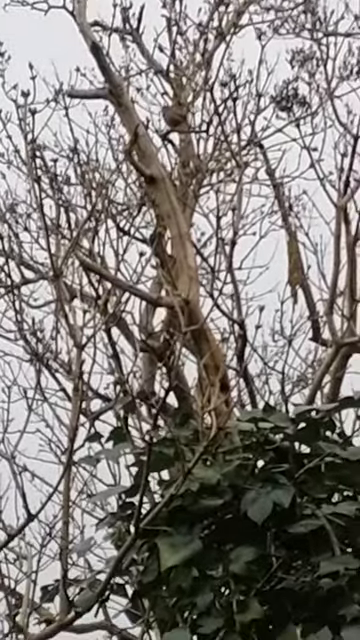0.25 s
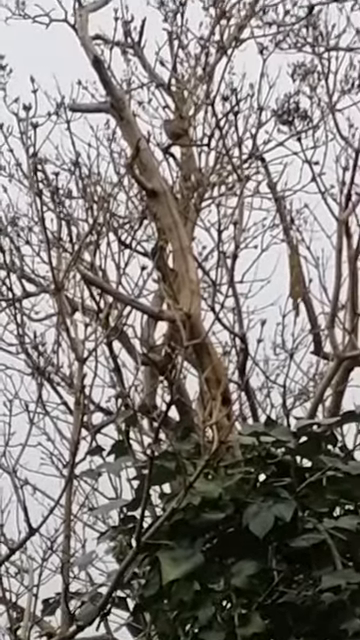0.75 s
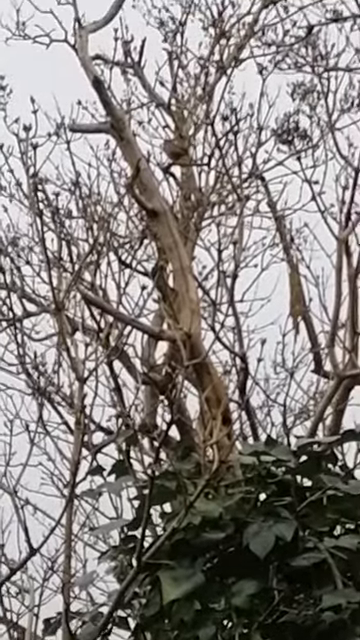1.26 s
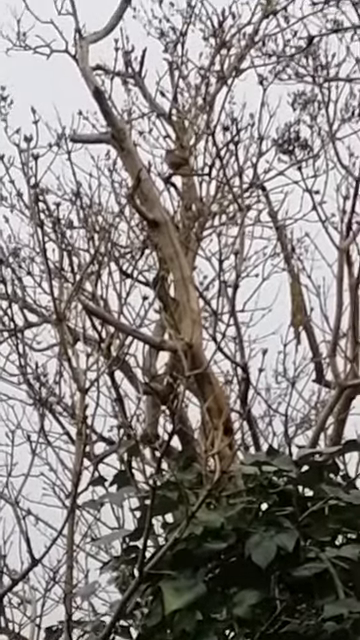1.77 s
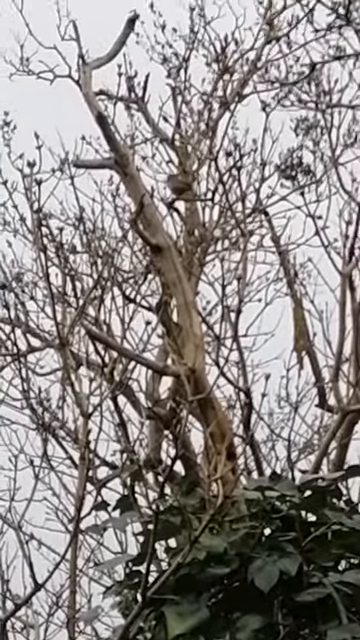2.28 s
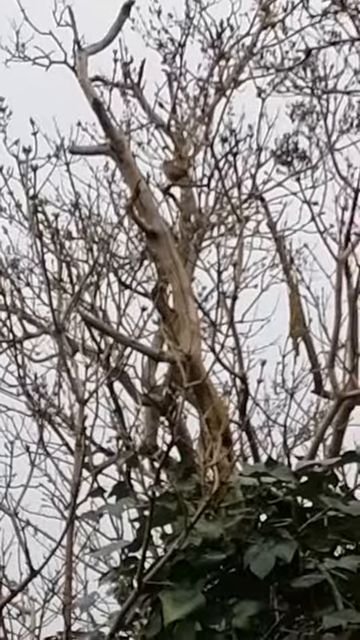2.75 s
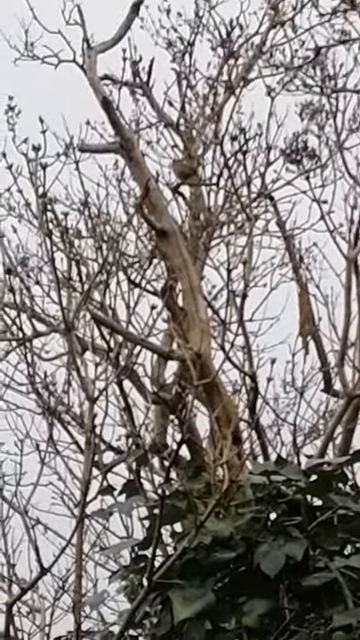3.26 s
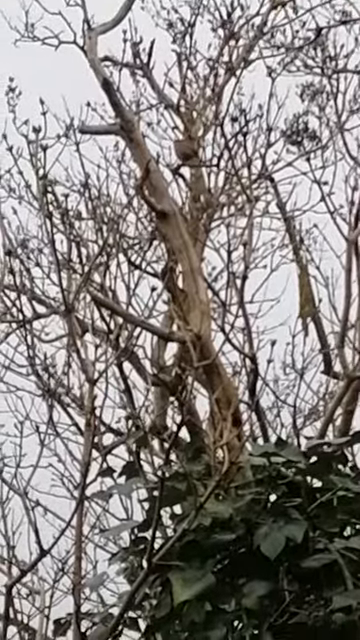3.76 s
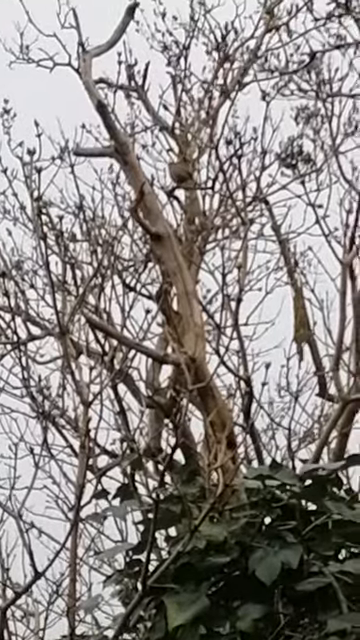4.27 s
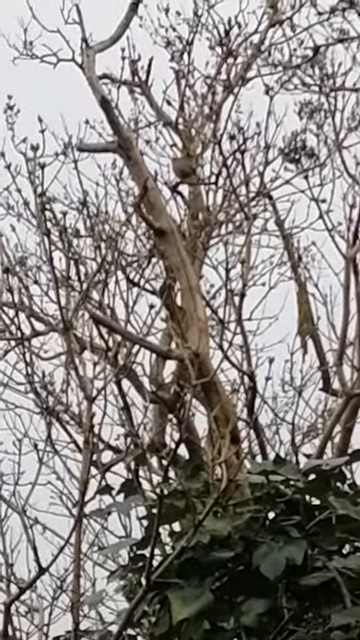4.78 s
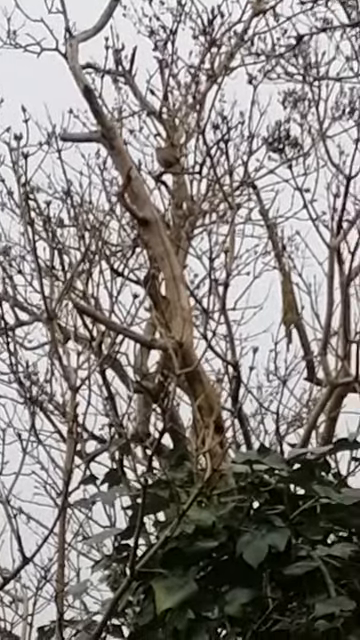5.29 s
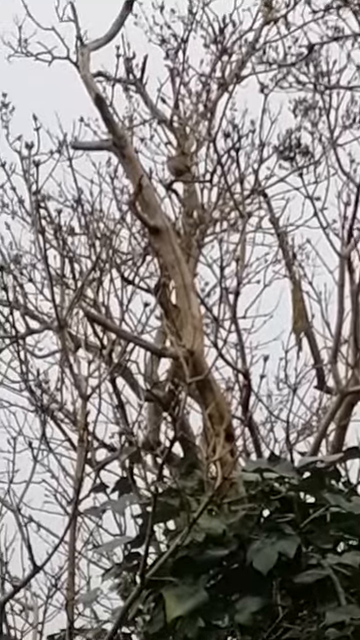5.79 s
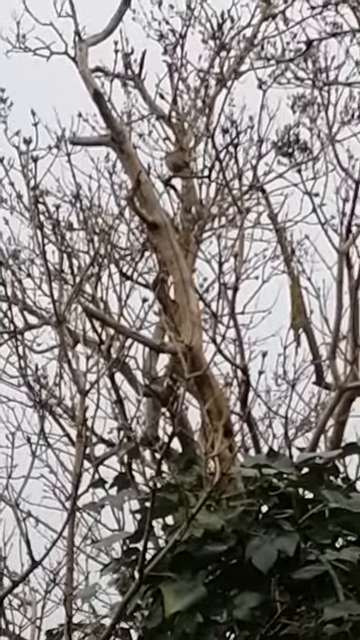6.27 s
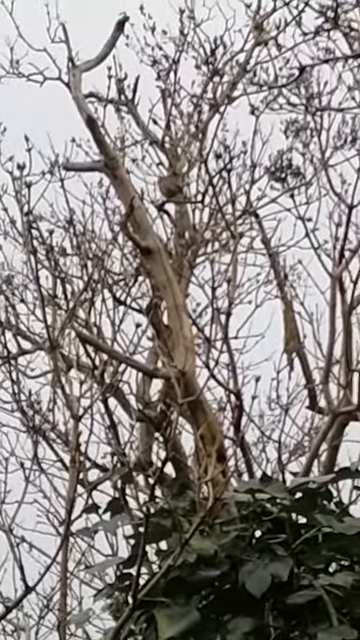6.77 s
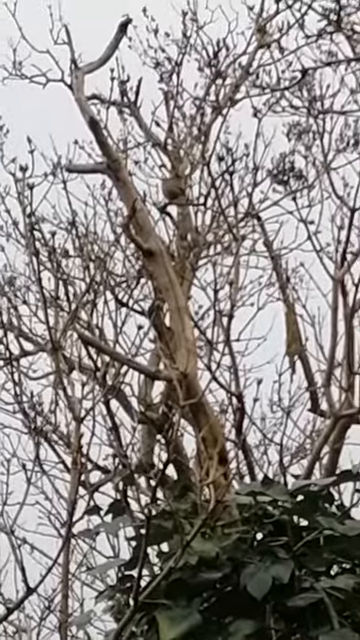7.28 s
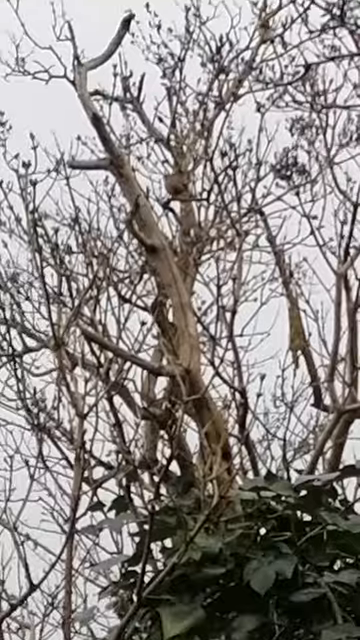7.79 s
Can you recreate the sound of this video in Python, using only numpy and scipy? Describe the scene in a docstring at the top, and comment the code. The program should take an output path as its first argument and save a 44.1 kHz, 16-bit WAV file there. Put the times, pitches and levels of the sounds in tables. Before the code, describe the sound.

A small wren is singing loudly nearby as the sound opens, with quick paired high chirps, then at 0.4-1.0 s an arching whistle, a lower whistle and a long steady one. From 1.1 to 1.8 s come four sharp upsweeps, each answered by a falling slur. A quieter dry, ticking rattle runs at about 1.9-2.2 s, then thin high whistles until 2.9. A fast trill of eight steep falling notes fills 2.9-3.65 s, followed by a long falling whistle, whip-like rising notes and fading slurs to about 4.6. The bird pauses; distant traffic swells gently around 4-6 s, with soft wind thumps, steady faint hiss, a barely audible low engine and faint scattered calls from farther birds. At 7 s a softer opening note starts a new verse: four paired chirps, then a whistle at 7.9, cut off at about 8 s. Short, diffuse woodland echoes surround the notes.

```python
"""A wren, already in song near the two microphone ports, whistles, slurs, rattles and trills in a bare tree; it
pauses, then starts a new verse. Each note is a gliding, nearly pure tone, scattered by trunks and twigs. Behind
it, filtered noise makes distant traffic that swells and fades, a slowly changing deep floor, gusts of wind on
the microphone and a steady hiss; a wavering low sine is a far engine. Fainter calls, mostly scattered sound,
come from further off."""
import sys
import numpy as np
from scipy import signal
from scipy.fft import rfft, irfft, next_fast_len
from scipy.io import wavfile
from scipy.ndimage import uniform_filter1d

SR = 44100
rng = np.random.default_rng(int(sys.argv[2]) if len(sys.argv) > 2 else 0)


def wav_record(signal):
    """Record a signal, one row per channel, as 16-bit PCM in the file named by sys.argv[1]."""
    frames = np.transpose(np.atleast_2d(signal))
    bounded = np.clip(frames, -1, 1)
    # unit amplitude maps onto the largest positive 16-bit level
    quanta = np.round(bounded * 32767).astype(np.int16)
    wavfile.write(sys.argv[1], SR, quanta)


N = 354563

# The birds' syllables at normal length and pitch:
# (attack [s], release [s], contour as a list of (time from note start [s], pitch [Hz]))
CREST = (0.026, 0.01784, [(0, 5280), (.013, 5740), (.036, 5880), (.056, 6210), (.086, 6080)])
DROP = (.004, .024, [(0, 5900), (.007, 5300), (.017, 4680), (.033, 3710)])
ARCH = (0.0091, 0.022, [(0, 6950), (.011, 7400), (.035, 7930), (.132, 8090), (.185, 7240), (0.209, 6740)])
LOW_WHISTLE = (.028, .006, [(0, 4860), (.02, 4958), (.055, 4697), (.103, 4673)])
WHISTLE = (0.014, 0.03, [(0, 6270), (.014, 6620), (0.036, 6810), (.07, 6890), (.165, 6803)])
RISE = (0.021, .014, [(0, 3440), (.016, 3470), (.032, 3920), (.058, 3727), (.075, 3440)])
UPSWEEP = (0.0059, .009, [(0, 5580), (.006, 6821), (.014, 7980), (.023, 8310), (.038, 7950), (.052, 7630)])
SLUR = (0.0099, 0.02, [(0, 5560), (.006, 6770), (.014, 6950), (.035, 6400), (.049, 5430), (.062, 4766),
        (0.075, 4165)])
TICK = (.001, 0.0018, [(0, 7580), (.003, 6700), (.005, 5544), (.009, 4870)])
TOCK = (0.0018, .002, [(0, 5950), (.003, 5440), (.007, 4950)])
FLICK = (.009, 0.025, [(0, 6150), (.009, 6730), (.018, 7510), (.031, 7430), (.076, 6545)])
HIGH_WHISTLE = (0.023, .025, [(0, 8424), (.01, 8180), (.02, 7586), (.033, 7400), (.058, 7950),
                (.178, 7960)])
SINK = (0.057, 0.0091, [(0, 6270), (.01, 6000), (.06, 5637), (.106, 5580)])
TRILL = (0.016, 0.02, [(0, 6894), (.016, 6527), (.024, 5520), (.033, 4650), (.047, 3690)])
LONG_FALL = (.01, 0.04, [(0, 7230), (.01, 7640), (0.026, 7506), (.083, 6940), (.198, 6854)])
WHIP = (0.017, .007, [(0, 4600), (.008, 4927), (.019, 5050), (.028, 5810), (.033, 6810)])
HIGH_SLUR = (.006, 0.022, [(0, 7990), (.035, 8300), (.061, 8250), (.088, 7550), (.11, 7300)])
LONG_SLUR = (0.011, 0.017, [(0, 8150), (.025, 7910), (.089, 7990), (.135, 7300), (.161, 7020)])
LOW_SLUR = (.022, .008, [(0, 4010), (.018, 4156), (.026, 4370), (.048, 3985), (.066, 3500), (.08, 3256)])
FALL = (0.013, 0.037, [(0, 3940), (.015, 3470), (.033, 3088), (.081, 2636)])
OPENING = (0.099, .025, [(0, 5500), (0.013, 6690), (.045, 6890), (.071, 6360), (.1, 5900), (.125, 5550),
           (.155, 5430)])

# The wren's runs of one syllable at a steady pace, levels before the paths and ports: (start [s], syllable,
# repeats, period [s], length factor, transposition [semitones], first level [dB], last level [dB])
RUNS = [ (-.125, CREST, 3, 0.16, 1.18, 0, -33, -31), (-.041, DROP, 3, 0.17, .96, -0.012, -30.5, -31.5),
        (1.082, UPSWEEP, 4, 0.18, 0.84, 0, -31, -29), (1.153, SLUR, 4, 0.19, 1.03, -.1, -29.5, -31),
        (1.936, TICK, 10, 0.027, 1.12, -.2, -42, -38.5), (1.95, TOCK, 10, .0294, 1, -.2, -47, -45),
        (2.9071, TRILL, 8, 0.095, 0.95, -0.12, -30.5, -30.5),
        (3.883, WHIP, 3, 0.1836, .92, -0.046, -29, -31), (3.921, HIGH_SLUR, 2, .185, 0.83, .1, -33.5, -35),
        (7.215, CREST, 4, 0.16, 1, 0.031, -36, -33), (7.299, DROP, 4, .1665, 1.07, 0, -37, -35.5), ]
# The wren's single notes, level before the paths and ports:
# (time [s], syllable, length factor, transposition [semitones], level [dB])
NOTES = [ (.389, ARCH, 1.034, -.12, -29.5), (.642, LOW_WHISTLE, 0.87, -0.11, -32),
         (.796, WHISTLE, 0.97, -0.049, -29), (.96, RISE, 0.9, -0.083, -39),
         (1.832, RISE, 0.91, 0.42, -38.5), (2.236, FLICK, 1.1, 0.19, -29),
         (2.36, LOW_WHISTLE, .96, -0.91, -35), (2.531, HIGH_WHISTLE, 1.12, 0.05, -29.5),
         (2.757, SINK, .9, 0.0068, -28), (3.679, LONG_FALL, .96, 0, -32),
         (4.302, LONG_SLUR, 0.96, 0.2, -36.5), (4.49, LOW_SLUR, .86, 0.025, -38.5),
         (6.972, OPENING, 1.005, -0.26, -42), (7.9, ARCH, 1.4, -0.59, -36), ]
# Calls of birds further off, level before the paths and ports:
# (time [s], syllable, length factor, transposition [semitones], level [dB])
FAR_CALLS = [ (.1, RISE, .6, -5, -55), (.65, RISE, .82, -1.5, -55), (.73, FALL, 0.8, 0, -49),
             (1.86, LOW_WHISTLE, 1.8, -10.5, -69.5), (2.862, WHIP, 1.45, -8, -56.5),
             (2.945, FALL, .8, 0.5, -49.5), (4.6, RISE, 1.23, 4, -56), (4.655, FALL, .88, 0, -49),
             (4.98, SINK, 0.55, 2.2, -68), (5.07, WHIP, 1.7, -1.5, -66), (5.345, TRILL, .95, -4.5, -58),
             (5.39, RISE, 0.31, -6, -52.5), (5.55, RISE, 0.91, .5, -65.5), (5.78, WHIP, 1.2, -2, -68),
             (6.68, SINK, 0.47, -.3, -72), (6.84, LOW_WHISTLE, 0.62, 0.5, -66),
             (6.85, LONG_FALL, .32, -0.3, -65), ]
# Echoes from trunks and limbs near the perch, level relative to the direct sound:
# (left delay [s], right delay [s], level [dB])
TRUNK_ECHOES = [(.0042, 0.0086, -16.5), (0.0142, 0.0095, -2.5), (0.0174, 0.016, -12.5), (0.024, 0.02, -20),
                (0.0338, 0.025, -15)]
# Response of the two ports to the birds: (frequency [Hz], left gain [dB], right gain [dB])
PORT_RESPONSE = [(2640, 0, 6), (4050, -3, -7), (5440, 2, 2), (5870, 1, -5.5), (7400, 2, -13.5),
                 (7950, -3, -14), (8800, -2.5, -11.5), (11700, -3.5, -7.5), (14500, -1.5, -4)]
# Background at the ports: (frequency [Hz], left-right correlation [-1 to 1], left minus right [dB])
BACKGROUND_SPREAD = [(30.02, 0.15, 2.5), (250, 0.95, 4), (622, .82, 4), (1100, 0.87, -3.5),
                     (1940, 0.28, -3), (15000, 0.25, 2.5)]

# Spectrum of tyre noise, shape only: (frequency [Hz], relative density [dB per Hz])
TYRE_SPECTRUM = [(200, -19.5), (400, -4), (600, -3.5), (900, 0.5), (1200, -5), (1650, -7.5), (2200, -15.5),
                 (3200, -18), (5000, -42.5), (9000, -50.5)]
# Spectrum of engine rumble, also used for wind buffeting: (frequency [Hz], relative density [dB per Hz])
RUMBLE_SPECTRUM = [(70, -12), (120, 1), (160, -3.5), (220, 2), (310, -2), (430, -15), (800, -26.5),
                   (3000, -66.5)]
# Spectrum of air on the microphone, shape only: (frequency [Hz], relative density [dB per Hz])
WIND_SPECTRUM = [(20, -2), (30, -0.5), (45, -1), (65, -2), (110, -1), (170, -20), (400, -38.5)]
# Spectrum of the steady hiss, shape only: (frequency [Hz], relative density [dB per Hz])
HISS_SPECTRUM = [(1500, 3.5), (3000, -1.5), (5200, 2.5), (7000, -1.5), (9000, -12.5), (12000, -9),
                 (15000, -2), (16000, -21)]

# Flow of the far road, before the offsets of its two parts: (time [s], level [dB])
ROAD_FLOW = [(0.1, -63.5), (0.16, -62), (0.25, -66), (1.68, -67.5), (2.1, -61.5), (2.64, -66.5),
             (3.88, -61), (4.1, -56.5), (4.31, -58.5), (4.64, -55), (4.9, -57), (6.25, -56.5),
             (7.79, -61.5), (7.9, -59)]
# A far engine's drone, before its random throb: (time [s], level [dB])
DRONE_LEVEL = [(0, -69.5), (1.899, -72.5), (2.2, -59.5), (2.7, -65.5), (2.95, -67), (6, -70), (6.5, -58.5),
               (7, -59.5), (7.4, -68), (7.7, -62), (8.04, -47.5)]
# A low, slowly changing floor of deep noise, before its overall offset: (time [s], level [dB])
LOW_FLOOR = [(0.0, -75), (3.09, -72.5), (4.97, -56.5), (7.03, -69.5), (8.04, -66.5)]
# Gusts on the microphone; length runs from the start until the dying away: (start [s], length [s], level [dB])
GUSTS = [(0.085, 0.1308, -62.5), (.72, 0.092, -62.5), (1.43, 0.15, -60), (1.959, 0.23, -57.5),
         (3.118, .13, -51.5), (4.193, .1, -53), (4.66, 0.28, -52), (5.21, .11, -49.5)]

LEAD = SR // 2  # samples of song before the scene opens
PORT_LAG_S = 0.00014  # the wren's direct sound reaches the right port later
ROAD_LAG_S = 0.00013  # the road reaches the left port first
REPEAT_SEMITONES, REPEAT_LENGTH, REPEAT_DB = 0.12, 0.012, 1  # spread from one repeat to the next
FADE_DB, SAG_DB_PER_S = 15.5, 13.5  # depth of a note's attack and release; steady sag along the note
SWEEP_SPREAD = 0.04  # random spread of glide depth, as a share
OCTAVE_DB = -36.5  # relative to the note's fundamental
PASS_S, PASS_WIDTH_S, PASS_DB = 4.74, 0.12, -49  # passing rumble: peak time, half width at -3 dB, peak level
GUST_ATTACK_S, GUST_RELEASE_S = 0.028, 0.079  # linear rise; time constant of the decay


def from_db(db):
    """Decibels to an amplitude factor."""
    return 10 ** (np.asarray(db) / 20)


def at_hz(points, hz, axis=1):
    """Read one column of a frequency table on a log-frequency axis."""
    points = np.array(points)
    return np.interp(np.log(hz + 1), np.log(points[:, 0]), points[:, axis])


def gain_curve(rows):
    """Turn (time [s], level [dB]) rows into a gain for every sample."""
    return from_db(np.interp(np.arange(N) / SR, *np.transpose(rows)))


def drift(rate_hz, size):
    """Random wander of spread about 1: straight lines between random knots, rate_hz knots a second."""
    knots = rng.standard_normal(4096)
    return np.interp(np.arange(size) * rate_hz / SR, np.arange(len(knots)), knots)


def syllable(shape, stretch, semitones, waver, flutter_db=1.12, edge_s=0.002):
    """One note of the syrinx: a gliding tone with attack, hold and release, a slight waver and a weak octave."""
    attack_s, release_s, contour = shape
    s, hz = np.transpose(contour)
    s = s * stretch
    t = np.arange(int(s[-1] * SR)) / SR
    # The peak pitch stays put while the glide below it deepens or flattens.
    depth = 1 + SWEEP_SPREAD * rng.standard_normal()
    hz = hz.max() * (hz / hz.max()) ** depth
    glide = uniform_filter1d(np.interp(t, s, hz), size=90) * 2 ** (semitones / 12)
    wavering = glide * (1 + waver * drift(350, len(t)))
    phase = 2 * np.pi * np.cumsum(wavering) / SR

    to_end = t[-1] - t
    effort = np.clip(np.minimum(t / attack_s, to_end / release_s) / stretch, 0, 1)
    gate = np.sin(np.pi / 2 * np.clip(np.minimum(t, to_end) / edge_s, 0, 1)) ** 2
    level_db = FADE_DB * (effort - 1) - SAG_DB_PER_S * t + flutter_db * drift(150, len(t))
    tone = np.sin(phase) + from_db(OCTAVE_DB) * np.sin(2 * phase)
    return np.sqrt(2) * gate * from_db(level_db) * tone


def runs():
    """Spell out each run: evenly paced repeats, stepping from first to last level, with small random changes."""
    notes = []
    for start, shape, repeats, period, stretch, semitones, first_db, last_db in RUNS:
        for k, db in enumerate(np.linspace(first_db, last_db, repeats)):
            longer, higher, louder = rng.standard_normal(3)
            length = stretch * (1 + REPEAT_LENGTH * longer)
            pitch = semitones + REPEAT_SEMITONES * higher
            notes.append((start + k * period, shape, length, pitch, db + REPEAT_DB * louder))
    return notes


def arrival(left_s, right_s):
    """One sound path: a band-limited impulse at each port, centred 16 samples after its delay."""
    offset = np.arange(SR) - 16 - SR * np.array([[left_s], [right_s]])
    return np.sinc(offset) * np.exp(-(offset / 8) ** 2)


def scatter(t60_s, build_s, per_s=2500, air_hz=6000, air_db_per_s=70):
    """Sparse reflections build up and decay, different at each port; the air then absorbs the treble."""
    t = np.arange(SR) / SR
    tail = rng.standard_normal((2, SR)) * (rng.random(SR) < per_s / SR)
    tail = tail * (1 - np.exp(-t / build_s)) * np.exp(-np.log(1000) * t / t60_s)
    tail = tail / np.sqrt(np.sum(tail ** 2, axis=1, keepdims=True))  # energy 1 at each port
    hz = np.fft.rfftfreq(SR, 1 / SR)
    low = irfft(rfft(tail) / (1 + (hz / air_hz) ** 8), SR)
    treble = tail - low
    return low + treble * from_db(-air_db_per_s * t)


def sing(notes, paths, waver):
    """Lay the notes out in time and convolve them with their paths and the response of the two ports."""
    size = next_fast_len(LEAD + N + 2 * SR)
    voice, hz = np.zeros(size), np.fft.rfftfreq(size, 1 / SR)
    for s, shape, stretch, semitones, db in notes:
        note = from_db(db) * syllable(shape, stretch, semitones, waver)
        at = LEAD + int(s * SR)
        voice[at:at + len(note)] += note
    left_db, right_db = at_hz(PORT_RESPONSE, hz, axis=1), at_hz(PORT_RESPONSE, hz, axis=2)
    at_ports = rfft(voice) * rfft(paths, size) * from_db([left_db, right_db])
    return irfft(at_ports, size)[:, LEAD:LEAD + N]


def wren():
    """The direct sound, echoes from trunks, a quick spray from the twigs and the longer tail of the wood."""
    direct = arrival(0, PORT_LAG_S)
    trunks = sum(from_db(db) * arrival(left_s, right_s) for left_s, right_s, db in TRUNK_ECHOES)
    twigs = from_db(2.5) * scatter(t60_s=0.3, build_s=0.0073, per_s=900)
    wood = from_db(-8) * scatter(t60_s=0.55, build_s=0.019, per_s=2300)
    return sing(NOTES + runs(), direct + trunks + twigs + wood, waver=0.0046)


def noise(spectrum, lag_s=0):
    """Coloured stereo noise whose likeness between ports varies with frequency; the ports' mean has rms 1."""
    size, sides = next_fast_len(N), np.array([[1], [-1]])  # +1 left, -1 right
    hz = np.fft.rfftfreq(size, 1 / SR)
    roll_off = np.maximum(1, hz / spectrum[-1][0]) ** 2  # above the last listed frequency
    colour = from_db(at_hz(spectrum, hz)) / roll_off
    mid, side = rfft(rng.standard_normal((2, size))) * colour
    alike = at_hz(BACKGROUND_SPREAD, hz)
    lean_db = at_hz(BACKGROUND_SPREAD, hz, axis=2)
    ports = np.sqrt(1 + alike) * mid + sides * np.sqrt(1 - alike) * side
    left_first = np.exp(1j * np.pi * sides * hz * lag_s)
    out = irfft(ports * from_db(sides * lean_db / 2) * left_first, size)[:, :N]
    return out / out.mean(axis=0).std()


def traffic(tyres_db=0.5, rumble_db=-2.5, flutter_db=0.64):
    """Tyre noise and engine rumble follow the far road's flow; one rumble comes and goes by its distance."""
    road = gain_curve(ROAD_FLOW) * from_db(flutter_db * drift(12, N))
    distance = np.hypot(1, (np.arange(N) / SR - PASS_S) / PASS_WIDTH_S)  # 1 at the nearest point
    passing = from_db(PASS_DB) / distance
    tyres = from_db(tyres_db) * road * noise(TYRE_SPECTRUM, lag_s=ROAD_LAG_S)
    rumble = np.hypot(from_db(rumble_db) * road, passing) * noise(RUMBLE_SPECTRUM)
    return tyres + rumble


def drone(pitch_hz=44, waver=0.015, throb_db=5.0):
    """A far engine: one low sine, equal at both ports, wavering in pitch and throbbing irregularly in level."""
    level = gain_curve(DRONE_LEVEL) * from_db(throb_db * drift(7.3, N))
    phase = 2 * np.pi * np.cumsum(pitch_hz * (1 + waver * drift(5.9, N))) / SR
    return np.sqrt(2) * level * np.sin(phase)


def wind(floor_db=3.5, buffet_db=-6.5):
    """A low floor of deep noise rises and falls slowly; each gust on the microphone rises, holds and dies away,
    with a higher buffeting."""
    t = np.arange(N) / SR
    gusts = np.zeros(N)
    for start, length, db in GUSTS:
        rise = np.clip((t - start) / GUST_ATTACK_S, 0, 1)
        decay = np.exp(-np.maximum(t - start - length, 0) / GUST_RELEASE_S)
        gusts += from_db(db) * rise * decay
    air = np.hypot(from_db(floor_db) * gain_curve(LOW_FLOOR), gusts) * noise(WIND_SPECTRUM)
    buffeting = from_db(buffet_db) * gusts * noise(RUMBLE_SPECTRUM)
    return air + buffeting


def hiss(level_db=-72.5):
    """Steady, mostly treble noise under everything."""
    return from_db(level_db) * noise(HISS_SPECTRUM)


def far_calls(direct_db=-8.5):
    """From far off, a call arrives mostly scattered, its edges blurred."""
    scattered = scatter(t60_s=0.25, build_s=0.0042, per_s=4200)
    return sing(FAR_CALLS, from_db(direct_db) * arrival(0, 0) + scattered, waver=0.014)


def scene():
    """The near wren over traffic, a far engine, wind, hiss and far calls."""
    return wren() + traffic() + drone() + wind() + hiss() + far_calls()


def record(dry):
    """Cut the top steeply above 15.7 kHz."""
    low_pass = signal.ellip(10, 0.1, 80, 15700, fs=SR, output="sos")
    return signal.sosfilt(low_pass, dry)


dry = scene()
out = record(dry)
wav_record(out)
```